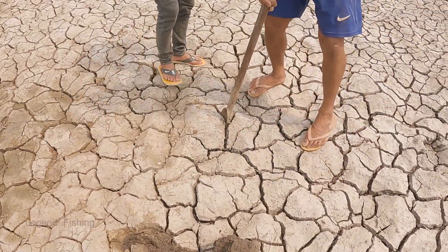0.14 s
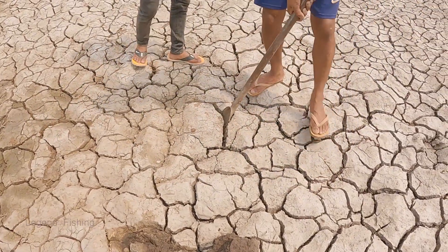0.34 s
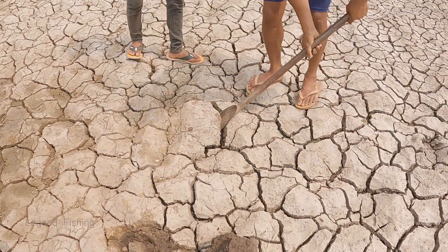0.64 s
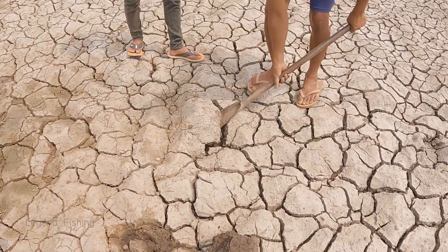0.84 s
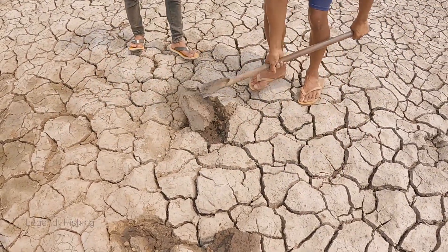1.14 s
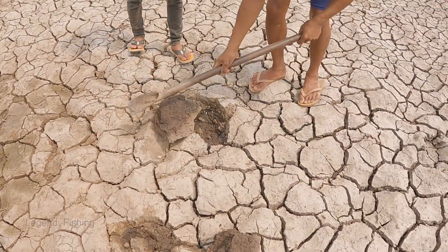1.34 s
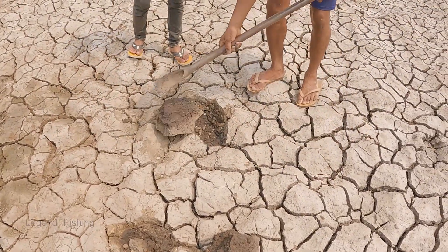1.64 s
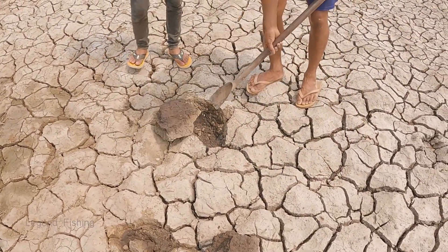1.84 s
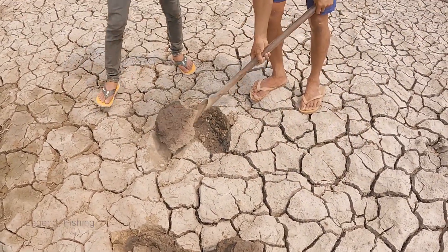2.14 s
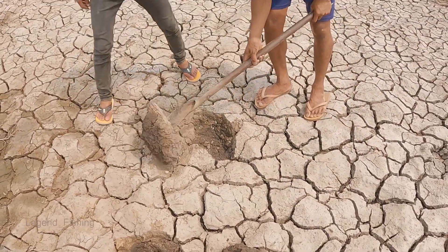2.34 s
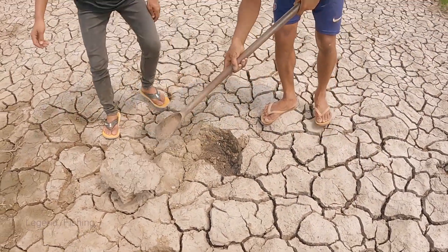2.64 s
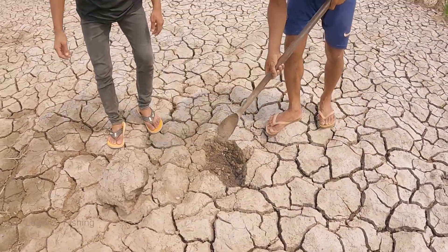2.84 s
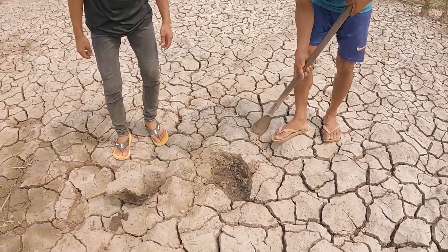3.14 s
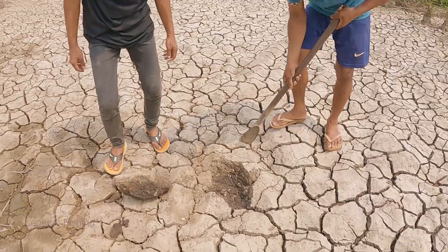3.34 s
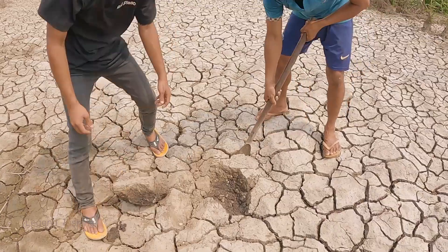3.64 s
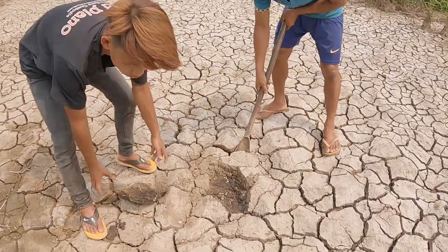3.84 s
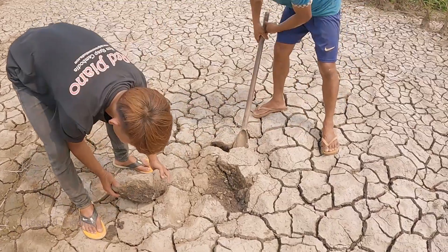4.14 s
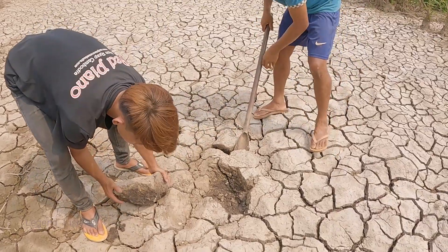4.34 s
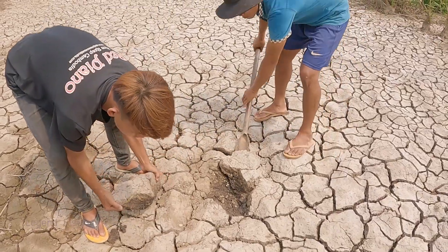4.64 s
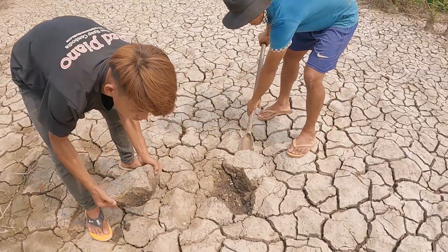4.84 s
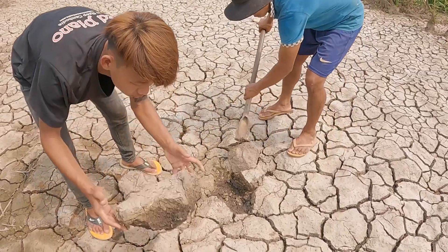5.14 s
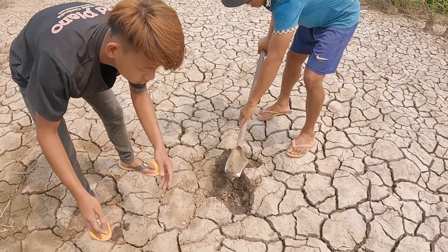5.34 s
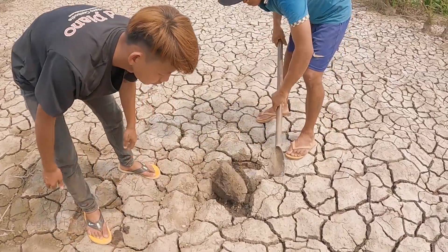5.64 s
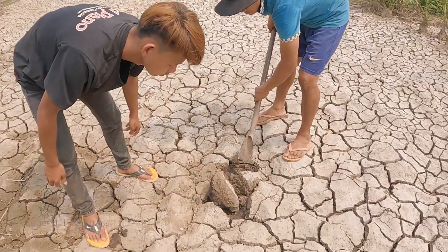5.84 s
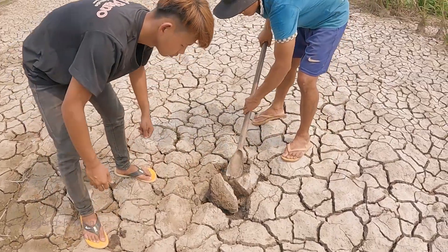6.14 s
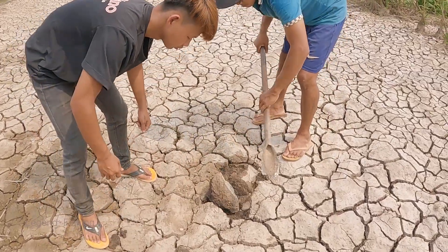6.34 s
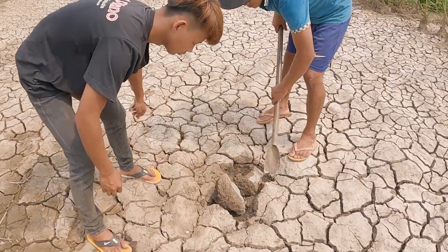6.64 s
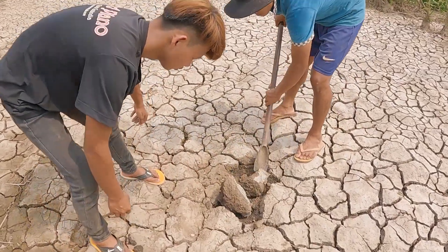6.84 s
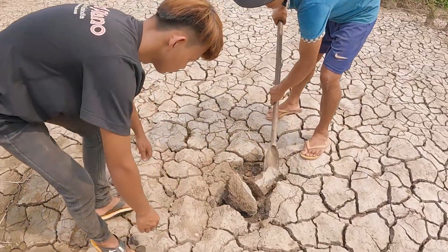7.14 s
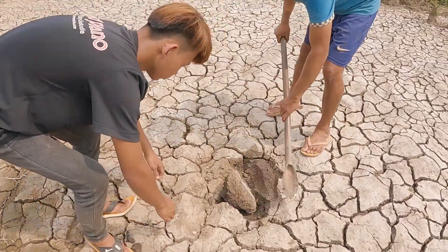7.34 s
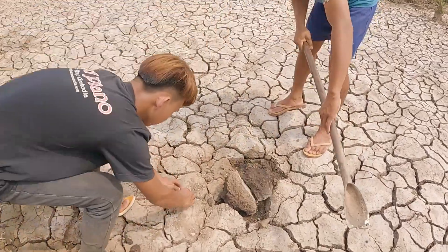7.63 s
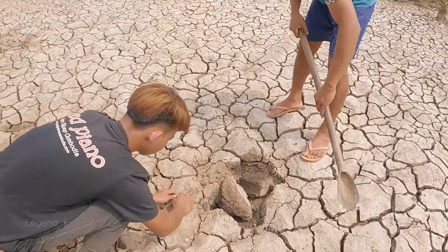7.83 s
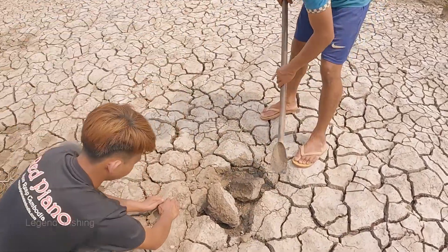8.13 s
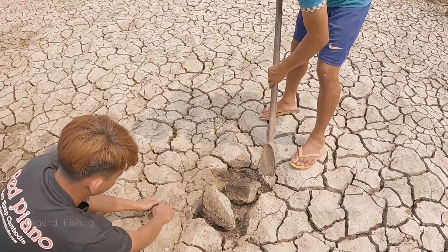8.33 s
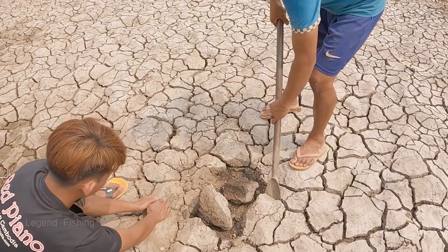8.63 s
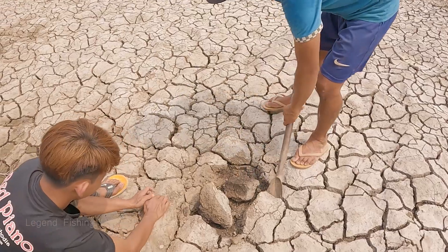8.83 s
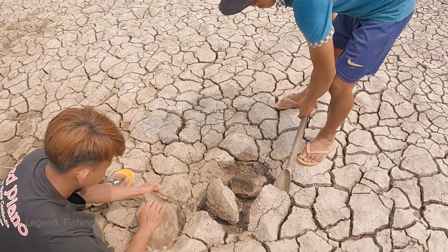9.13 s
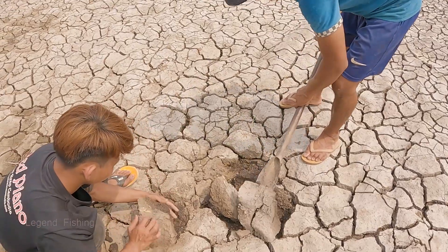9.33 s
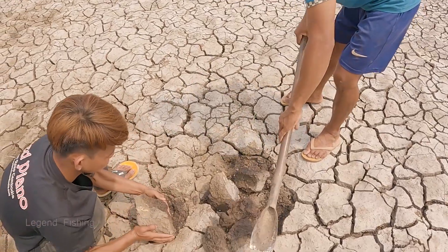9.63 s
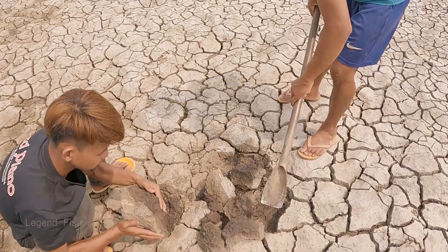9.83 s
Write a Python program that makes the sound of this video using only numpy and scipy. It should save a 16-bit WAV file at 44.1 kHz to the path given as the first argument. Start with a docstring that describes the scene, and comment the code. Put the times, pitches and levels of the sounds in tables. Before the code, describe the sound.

Close stereo outdoors on a dry cracked field. A steel spade grinds into hard clay, knocks out a sharp crunch with a short metallic ring, and clods thud down. Grit trickles between irregular blows, hands brush the shaft, and a small bird whistles short chirps throughout. Later blows crunch heavier, then an insect buzzes faintly near the end.

```python
"""A steel spade on a hollow steel shaft chops, scrapes and pries at sun-dried mud in an open field.
Noise bursts and damped grains make the clay; damped modes ring as blade and shaft; low swings are thuds.
Band-shaped noise gives palms on the shaft, far air and light wind rumble on two close microphones.
A gliding sine whistles as a small bird calling again and again at uneven gaps;
clicks and buzz rattle as an insect near the end."""
import sys
import numpy as np
from scipy import signal
from scipy.fft import rfft, irfft, next_fast_len
from scipy.io import wavfile
from scipy.ndimage import uniform_filter1d, map_coordinates

SR = 44100
rng = np.random.default_rng(int(sys.argv[2]) if len(sys.argv) > 2 else 0)


def master(y):
    """Save y as 16-bit WAV."""
    cut = np.clip(np.atleast_2d(y).T, -1, 1)
    pcm = np.round(cut * 32767)  # scale
    wavfile.write(sys.argv[1], SR, pcm.astype(np.int16))


N = 440118
T = np.arange(N) / SR

# far air and insects: (frequency [Hz], density [dB per Hz])
FIELD_SPECTRUM = [(65, -76), (110, -15), (188, 0.5), (261, -10.5), (792, -28), (1410, -15.5), (3480, -36.5),
                  (7450, -14), (8260, -31), (11700, -44), (15000, -103)]
FIELD_DB = -67
# wind on the microphone ports: (frequency [Hz], density [dB per Hz])
RUMBLE_SPECTRUM = [(15, -11), (35, 5.5), (70, -5), (120, -9), (170, 0.5), (260, -57)]
# wind: (time [s], level [dB])
WIND_LEVEL = [(0, -74), (.6, -100), (2.06, -69.5), (2.67, -58), (3.17, -67.5), (3.56, -61), (4.3, -70),
              (5.9, -73), (6.34, -59), (7.09, -65), (7.64, -53), (8.4, -66), (9.98, -60)]
# loose grit: (time [s], level [dB])
CRUMBLE_LEVEL = [(0.0, -64.5), (0.67, -59), (1.03, -69), (1.25, -59.5), (1.8, -69), (2.06, -67),
                 (2.28, -60), (3.11, -74), (3.72, -63), (4.5, -81), (5.31, -60.5), (5.55, -54), (6.14, -63),
                 (7.0, -58), (7.3, -69), (7.55, -56), (8.5, -75.5), (8.73, -66), (9.59, -59), (9.98, -54.5)]
# loose grit: (frequency [Hz], density [dB per Hz])
GRIT_SPECTRUM = [(150, 6.5), (297, 5.5), (687, -48), (935, -3), (1390, -1), (5010, -1), (9450, -9),
                 (15000, -35)]
TRICKLE_DB, TRICKLE_T60_S = -22, 0.11  # grit set loose by every crunch: level relative to it
# blade crushing clay, or a clod bursting:
# (start [s], level at the top [dB], rise [s], hold [s], tilt [dB per octave])
CRUNCHES = [(0.045, -32.5, 0.06, 0.02, 4), (0.151, -44.5, 0.012, 0.035, 2), (0.44, -50, 0.031, 0.12, -0.5),
            (1.47, -34, 0.0018, 0.0078, -2), (1.809, -39, 0.006, 0.0078, -7),
            (2.162, -19, 0.0016, 0.0032, 2), (2.517, -37.5, 0.014, 0.008, 2.5),
            (2.888, -47.5, 0.0068, 0.054, 0.5), (3.547, -24.5, 0.0024, 0.036, 3),
            (3.697, -47, 0.0034, 0.081, 0), (4.014, -43, 0.0082, 0.043, -2.5),
            (5.563, -22.5, 0.0006, 0.013, -2.5), (5.6, -35, 0.0045, 0.022, -8.5),
            (6.143, -34.5, 0.00084, 0.0098, 1), (6.19, -35.5, 0.0054, 0.017, -4),
            (6.318, -36, 0.029, 0.0058, 2), (6.444, -33.5, 0.0067, 0.0019, -3.5),
            (6.918, -28.5, 0.00047, 0.028, 3), (7.338, -42, 0.0069, 0.071, -1.5),
            (7.436, -44, 0.046, 0.01, 1), (7.525, -46.5, 0.0069, 0.16, -4),
            (8.599, -23.5, 0.015, 0.018, 0.5), (8.636, -32, 0.0062, 0.034, 1),
            (9.597, -44.5, 0.019, 0.049, 2), (9.737, -29.5, 0.013, 0.002, 0)]
SAG_DB = -9  # fall of a crunch over its hold
SETTLE_T60_S = 0.12
TREBLE_HZ, TREBLE_T60_S = 2440, 0.07  # a crunch dies sooner above this pitch
# broken clay: (frequency [Hz], density [dB per Hz])
CLAY_SPECTRUM = [(150, 2), (250, 5.5), (391, -9.5), (1160, -13.5), (1820, -11), (3210, -7.5), (5030, -10),
                 (8880, -12), (15400, -42.5)]
# top-end roll-off of the microphones, on grains, snaps and scrapes: (frequency [Hz], gain [dB])
ROLLOFF = [(7000, 0.5), (10000, -1.5), (15000, -34)]
# blade and shaft wall modes: (frequency [Hz], level [dB], t60 at damping 1 [s])
STEEL_MODES = [(528, -5, .15), (810, -8, .14), (1100, -12, .15), (1170, -7, .18), (1480, -10, .1),
               (1630, -7, .2), (1920, -12, .15), (2095, -9, .24), (2333, -7, .2), (2530, -12, .24),
               (2670, -7, .07), (3100, -12, .17), (3505, -10, .22), (3825, -11, .13), (4135, -9, .21),
               (4900, -18, .1), (6950, -12, .08), (7650, -17, .1)]
# modes the blade sounds most while buried: frequency [Hz]
BURIED_HZ = np.array([1170, 4135])
FAVOUR_DB, BURIED_DB = 8, 12  # lift of the best excited modes: ringing, buried in clay
# single crumbs and flakes snapping: (time [s], peak level [dB], frequency [Hz])
CRACKS = [(0.08, -20, 3440), (0.435, -27.5, 2400), (0.568, -36, 1095), (0.603, -45.5, 664),
          (0.699, -34, 4040), (0.753, -37.5, 1270), (1.118, -34.5, 1560), (1.67, -40, 1210),
          (2.165, -21.5, 480), (2.251, -36, 2800), (2.411, -42, 1230), (2.433, -38, 540),
          (2.731, -41.5, 530), (2.843, -43, 4150), (2.947, -39.5, 6700), (3.553, -19, 3930),
          (3.587, -25, 1430), (3.68, -38, 1300), (3.781, -29, 1860), (4.002, -37.5, 1670),
          (4.642, -38.5, 4160), (4.842, -41, 1280), (5.414, -30.5, 6540), (5.624, -32, 1200),
          (5.656, -41, 1500), (5.715, -46, 1820), (5.82, -43.5, 4340), (5.849, -40.5, 7100),
          (5.902, -37, 1410), (6.235, -39.5, 970), (6.587, -28.5, 1240), (6.786, -40, 614),
          (7.041, -39, 4200), (7.087, -40.5, 2260), (7.13, -39.5, 1630), (7.15, -38.5, 1690),
          (7.27, -30.5, 1260), (7.278, -32.5, 617), (7.341, -39, 1240), (7.361, -30, 1260),
          (7.389, -34, 926), (7.411, -47, 956), (7.524, -39, 958), (7.537, -45, 926), (7.584, -40, 1500),
          (7.599, -38.5, 700), (7.635, -38.5, 1040), (7.675, -35, 493), (7.692, -30.5, 1850),
          (7.771, -42, 1150), (7.855, -41.5, 1340), (8.121, -37.5, 1330), (8.657, -32.5, 9250),
          (8.83, -34, 5470), (9.712, -35.5, 2060), (9.779, -35, 470), (9.828, -34.5, 1170)]
SNAP_S, SNAP_CYCLES = 0.018, 6  # t60 of a snap: fixed part plus cycles of its pitch
# bird calls: (time [s], level [dB], last note's added level [dB])
BIRD_CALLS = [(0.2836, -41, -8), (0.8832, -39.5, -16), (1.358, -43, -10), (1.892, -43.5, -11),
              (2.3985, -47, -6), (2.8506, -46, 1.5), (3.3348, -45.5, -4), (3.7292, -45.5, 1),
              (4.116, -46, 1.5), (4.7076, -46.5, 2.5), (5.2057, -47.5, 3), (5.563, -43, -10),
              (6.074, -47.5, 0), (6.495, -47, 3.5), (6.975, -44.5, -2), (7.481, -44, -4), (7.9605, -47, -4),
              (8.402, -45.5, -8), (8.796, -48.5, -8), (9.114, -45, -3.5), (9.5575, -44, -6),
              (9.8218, -44.5, -4)]
# one call before variation: (time from its upstroke [s], frequency [Hz], level [dB])
CHIRP = [(-.013, 3600, -15), (-.005, 4170, 0), (-.0032, 4300, -14), (-.0025, 5000, -12), (0, 5700, -3),
         (.004, 6050, -1), (.008, 5400, -2), (.011, 4900, -13), (.015, 4660, -2), (.023, 4650, 0),
         (.033, 5000, -24)]
# blade dragging over the crust: (start [s], length [s], level [dB], best excited mode [Hz])
SCRAPES = [(0.401, 0.082, -51, 1480), (4.643, 0.068, -55, 4135), (4.721, 0.16, -59.5, 1170),
           (4.929, 0.28, -61, 1630), (5.299, 0.26, -53.5, 1480), (6.311, 0.03, -42, 2333),
           (6.798, 0.045, -62, 2670), (9.005, 0.071, -49, 1630)]
SCRAPE_WIDTH_HZ = 310
# palms sliding on the shaft: (start [s], loudest [s], end [s], level [dB])
SLIDES = [(0.708, 0.9, 1.15, -48.5), (1.152, 1.18, 1.3, -57.5), (1.451, 1.559, 1.664, -47),
          (1.667, 1.832, 1.873, -51), (1.933, 2.116, 2.13, -52), (2.71, 2.85, 3.07, -61),
          (4.014, 4.24, 4.58, -53)]
GRIP_S, START_DB, END_DB = 0.0044, -7.5, -18  # fade at both ends; level there against the loudest
# skin on steel: (frequency [Hz], density [dB per Hz])
PALM_SPECTRUM = [(585, -62), (2070, -17.5), (2390, -14), (3370, -15), (4110, -4), (5380, -10.5),
                 (11900, -18.5), (15000, -41)]
# shaft wall under the palms: (frequency [Hz], width [Hz], gain [dB])
PALM_MODES = [(1240, 100, 31.5), (4160, 9.1, 14.5), (7950, 1100, 10)]
# clods and heels on the ground: (time [s], peak level [dB], frequency [Hz])
THUDS = [(0.723, -41.5, 219), (1.485, -27.5, 188), (1.81, -44, 59.5), (2.729, -30.5, 67.7),
         (2.842, -37.5, 185), (3.19, -37.5, 173), (3.499, -44, 62.3), (3.554, -35, 142), (3.777, -42, 212),
         (4.02, -42, 187), (4.641, -49, 156), (4.914, -50.5, 116), (5.566, -29, 169), (5.589, -33, 61.3),
         (6.006, -44.5, 127), (6.172, -17.5, 176), (6.214, -34, 68.4), (6.454, -22, 162), (6.59, -38, 175),
         (6.799, -38, 174), (7.36, -32.5, 240), (7.666, -40.5, 74), (7.984, -37, 169), (8.607, -34, 169),
         (8.64, -29.5, 188), (9.191, -52, 70.4), (9.747, -27, 183), (9.782, -27, 175)]
# blows that leave the steel ringing:
# (time [s], level [dB], best excited [Hz], second best excited [Hz], damping by clay and hands [factor])
RINGS = [(1.403, -47.5, 1170, 2333, 0.68), (2.074, -43, 3100, 3100, 1.25), (2.164, -32, 4135, 3100, 1.6),
         (2.527, -37, 1630, 2670, 0.94), (5.437, -43.5, 1630, 3505, 2.4), (5.494, -41, 3100, 3505, 1.7),
         (6.146, -32, 528, 2095, 2.7), (6.341, -30.5, 3505, 4900, 3.7), (6.919, -27.5, 2333, 4135, 1.1)]
# air column in the shaft: (frequency [Hz], level [dB], t60 at damping 1 [s])
SHAFT_MODES = [(200, -2, .5), (403, 0, .42), (603, -8, .3), (806, -7, .18), (1010, -14, .17),
               (1207, -6, .1)]
# knocks that sound the air column: (time [s], level [dB], best excited [Hz], damping by hands [factor])
KNOCKS = [(2.164, -33, 1207, 1.1), (6.919, -54.5, 200, 1.03), (7.272, -44, 1207, 0.96)]
# insect: (time [s], click level [dB], buzz level [dB])
WINGS = [(9.38, -71, -59), (9.43, -58, -55), (9.52, -55.5, -56.5), (9.6, -59.5, -56), (9.72, -58.5, -58)]
WING_HZ = 238  # mean beat rate
# digging, left against right port: (frequency [Hz], phase lead [rad])
LEAD = [(100, 0.37), (800, -0.32), (3100, -0.71), (6000, -0.95), (7500, 0.38), (9300, 0.45)]
# digging, left against right port: (frequency [Hz], level difference [dB])
LEVEL = [(150, 0), (400, -2), (2500, -1.5), (6000, 0), (12000, .5)]
TOP_HZ = 15500


def amp(db):
    """dB to gain."""
    return 10 ** (np.asarray(db) / 20)


def unit(x):
    """Scaled to rms 1."""
    return x / np.sqrt(np.mean(x ** 2) + 1e-20)


def along(points, hz):
    """(frequency, value) points interpolated on a log axis."""
    f, v = np.transpose(points)
    return np.interp(np.log(hz + 1), np.log(f + 1), v)


def curves(rows):
    """One value per sample for each column after the time."""
    s, *cols = np.transpose(rows)
    return [np.interp(T, s, c) for c in cols]


def wobble(rate_hz):
    """A smooth random curve, rate_hz knots a second."""
    return map_coordinates(rng.standard_normal(int(N * rate_hz / SR) + 4), [T * rate_hz])


def filtered(x, response):
    """x times a response of frequency."""
    m = next_fast_len(x.shape[-1] + 4096)
    return irfft(rfft(x, m) * response(np.fft.rfftfreq(m, 1 / SR)), m)[..., :x.shape[-1]]


def resonance(f, hz, width_hz):
    """A damped resonance with top 1."""
    return 1j * f * width_hz / (hz * hz - f * f + 1j * f * width_hz)


def pair(spectrum, alike, rough_db=0, rate_hz=100):
    """Stereo noise of rms 1, partly shared, with a fast uneven level."""
    noise = rng.standard_normal((2, N)) * amp(rough_db * wobble(rate_hz))
    mid, side = filtered(noise, lambda hz: amp(along(spectrum, hz)))
    turn = np.arccos(np.clip(alike, 0, 1)) / 2
    left = np.cos(turn) * mid + np.sin(turn) * side
    right = np.cos(turn) * mid - np.sin(turn) * side
    return unit(np.array([left, right]))


def add(out, s, x):
    """Mixes x into out from time s."""
    part = out[..., max(round(s * SR), 0):][..., :x.shape[-1]]
    part += x[..., :part.shape[-1]]


def grains(times, sizes, hz, spread_oct, cycles):
    """Tiny damped sines at scattered pitches, summed."""
    scattered_hz = hz * 2 ** (spread_oct * rng.standard_normal(len(times)))
    pitch_hz = np.clip(scattered_hz, 300, 9000)[:, None]
    k = np.arange(400)
    turns = pitch_hz * k / SR
    # low grains last longer, so they start weaker
    start = sizes[:, None] * np.sqrt(pitch_hz / hz)
    wave = start * np.sin(2 * np.pi * turns) * np.exp(-turns / cycles) * (1 - k / len(k))
    index = (times * SR).astype(int)[:, None] + k
    out = np.bincount(index.ravel(), wave.ravel(), N + len(k))[:N]
    return filtered(out, lambda f: amp(along(ROLLOFF, f)))


def field():
    """Far hiss of the open field and wind lumps on the ports, both shaped noise."""
    swell_db = 1.5 * wobble(3)
    air = amp(FIELD_DB + swell_db) * pair(FIELD_SPECTRUM, 0.1)
    lumps = amp(5.5 * wobble(11) - 4)
    return air + amp(curves(WIND_LEVEL)[0]) * lumps * pair(RUMBLE_SPECTRUM, 0.89)


def grit_level():
    """Level of loose grit, in fits with gaps, plus a trickle after every crunch."""
    level = amp(curves(CRUMBLE_LEVEL)[0] + 2 * wobble(14))
    for s, db, rise, hold, _ in CRUNCHES:
        add(level, s + rise + hold, amp(db + TRICKLE_DB - 60 * T[:SR] / TRICKLE_T60_S))
    return level


def crumbs():
    """Loose grit trickles; crumbs of all sizes tick on the crust in clumps, with a few duller lumps."""
    times = np.sort(rng.uniform(0, T[-1], 9000))
    clump_db = 4 * wobble(45)[(times * SR).astype(int)]
    size_db = np.minimum(4 * rng.exponential(size=len(times)) + clump_db, 17)
    ticks = unit(grains(times, amp(size_db), hz=2180, spread_oct=1.264, cycles=4.6))

    times = rng.uniform(0, T[-1], 900)
    clump_db = 3.3 * wobble(28)[(times * SR).astype(int)]
    size_db = np.minimum(5 * rng.exponential(size=len(times)), 8) + clump_db
    lumps = unit(grains(times, amp(size_db), hz=937, spread_oct=0.96, cycles=4.8))

    trickle = pair(GRIT_SPECTRUM, 1.0, rough_db=4.0, rate_hz=66)
    return grit_level() * (trickle + amp(-3) * ticks + amp(-8) * lumps)


def crunches():
    """A shower of fractures that swells, holds and dies, coloured by the buried blade."""
    out, t = np.zeros((2, N)), T[:SR // 2]
    times = np.sort(rng.uniform(0, T[-1], 9000))
    sizes = amp(np.minimum(4 * rng.exponential(size=len(times)), 12))
    shards = unit(grains(times, sizes, hz=1600, spread_oct=1.1, cycles=3))
    mode_hz = np.transpose(STEEL_MODES)[0]
    for s, db, rise, hold, tilt_db in CRUNCHES:
        # clay grips the blade differently each time
        touch_db = rng.normal(0, 3, len(STEEL_MODES)) + BURIED_DB * np.isin(mode_hz, BURIED_HZ)

        def colour(f):
            modes = sum(amp(level_db / 2 + extra_db) * resonance(f, hz, 320)
                        for (hz, level_db, _), extra_db in zip(STEEL_MODES, touch_db))
            return (1 + amp(4) * modes) * amp(tilt_db * np.log2((f + 200) / 2000))

        lumps = amp(2.8 * map_coordinates(rng.standard_normal(100), [t * 180]))
        after_s = np.maximum(t - rise - hold, 0)
        sag_db = SAG_DB * np.clip((t - rise) / hold, 0, 1)
        shape = np.clip(t / max(rise, .0005), 0, 1) * amp(sag_db - 60 * after_s / SETTLE_T60_S)

        noise = rng.standard_normal((2, len(t))) * [[1], [.2]]
        mid, side = unit(filtered(noise, lambda hz: amp(along(CLAY_SPECTRUM, hz))))
        dust = mid + side * np.array([[1], [-1]])
        fractures = lumps * (dust + amp(-3.5) * np.resize(shards[round(s * SR):], len(t)))

        sooner = amp(-60 * after_s * max(1 / TREBLE_T60_S - 1 / SETTLE_T60_S, 0))
        late_low = filtered(shape * (1 - sooner) * fractures, lambda hz: 1 / (1 + (hz / TREBLE_HZ) ** 2))
        burst = filtered(shape * sooner * fractures + late_low, colour)
        add(out, s, amp(db) * unit(burst) * np.sqrt(np.mean(shape ** 2)))
    return out


def cracks():
    """Each snap is a short puff of noise around its own pitch; low ones last longer."""
    out, t = np.zeros(N), T[:SR // 8]
    for s, db, centre_hz in CRACKS:
        decay = amp(-60 * t / (SNAP_S + SNAP_CYCLES / centre_hz))
        puff = rng.standard_normal(len(t)) * decay * (1 - np.exp(-t / 0.00053))
        puff[:4] = 0.82  # the break itself: one hard click

        def colour(f):
            body = resonance(f, centre_hz, 0.27 * centre_hz) + 0.065 * amp(along(CLAY_SPECTRUM, f))
            return amp(along(ROLLOFF, f)) * body

        puff = filtered(puff, colour)
        add(out, s, amp(db) * puff / np.abs(puff).max())
    return out


def bird():
    """A gliding sine, a little different each call, with a soft noise-tail echo from the field's edge."""
    out, t = np.zeros(N), T[:SR // 16]
    s0, hz, db = np.transpose(CHIRP)
    # relative changes: pitch, pace, upturn of the last note
    change = rng.standard_normal((len(BIRD_CALLS), 3)) * [.012, .05, .07]
    for (s, top_db, tail_db), (pitch, pace, upturn) in zip(BIRD_CALLS, change):
        u = s0[0] + t * (1 + pace)
        bend = 1 + pitch + abs(upturn) * np.clip(u / s0[-1], 0, 1) ** 2
        glide_hz = bend * uniform_filter1d(np.interp(u, s0, hz), 60)
        phase = 2 * np.pi * np.cumsum(glide_hz) / SR
        level_db = top_db + np.interp(u, s0, db, right=-120) + tail_db * (u > .011)
        add(out, s + s0[0], amp(level_db) * np.sin(phase))
    tail = rng.standard_normal((2, SR // 4)) * amp(-60 * T[:SR // 4] / 0.077)
    delayed = np.pad(out, (200, 0))[None]
    echo = signal.fftconvolve(delayed, tail / np.linalg.norm(tail[0]), axes=1)[:, :N]
    return out * amp([[-1.5], [1.5]]) + amp(-2) * echo


def scrapes():
    """Uneven friction noise that sounds only through the modes of the steel, most near the best pitch."""
    out = np.zeros(N)
    for s, length, db, aim_hz in SCRAPES:
        best_hz = min(np.transpose(STEEL_MODES)[0], key=lambda hz: abs(hz - aim_hz))
        u = np.linspace(0, 1, round(length * SR))

        def wall(f):
            modes = 0
            for hz, level_db, _ in STEEL_MODES:
                favour_db = 14.0 * (hz == best_hz) - 5.9 * abs(np.log2(hz / best_hz))
                modes = modes + amp(level_db + favour_db) * resonance(f, hz, SCRAPE_WIDTH_HZ)
            return amp(along(ROLLOFF, f)) * modes

        rub = rng.standard_normal(len(u)) * amp(4.1 * wobble(61.2)[:len(u)])
        stroke = np.sqrt(np.abs(np.sin(np.pi * u)))
        add(out, s, amp(db) * stroke * unit(filtered(rub, wall)))
    return out


def palms():
    """Skin rubs the shaft: a smooth hiss coloured by its wall."""
    level = 0
    for start, top, end, db in SLIDES:
        knots_s = [start - GRIP_S, start, top, end, end + GRIP_S]
        knots_db = db + np.array([-30, START_DB, 0, END_DB, -40])
        level = level + amp(np.interp(T, knots_s, knots_db, -120, -120))

    def wall(f):
        return 1 + sum(amp(db) * np.abs(resonance(f, hz, width_hz)) for hz, width_hz, db in PALM_MODES)

    return level * unit(filtered(pair(PALM_SPECTRUM, 0.99, rough_db=1.5, rate_hz=87), wall))


def thuds():
    """A heavy soft contact: the ground gives, swings back once and settles, with deeper sway and rubble."""
    out, t = np.zeros(N), T[:SR // 4]
    for s, db, hz in THUDS:
        cycles = hz * t
        swing = -np.sin(2 * np.pi * cycles) * cycles * np.exp(1 - cycles / .6)
        sway_hz = 70 * 2 ** rng.normal(0, 0.314)
        sway = np.sin(2 * np.pi * sway_hz * t) * np.exp(-t / 0.017) * (1 - np.exp(-t / 0.006))
        rough = unit(filtered(rng.standard_normal(len(t)), lambda f: resonance(f, 2 * hz, 2 * hz)))
        rubble = rough * cycles * np.exp(-1.5 * cycles)
        push = swing + 0.36 * sway + 0.3 * rubble
        add(out, s, amp(db) * push / np.abs(push).max())
    return out


def ring(modes, damping, best_hz, waver_rad, t):
    """Decaying modes at fresh strengths, strongest at the best pitches, each wavering in phase."""
    hz, db, t60 = np.transpose(modes)[..., None]
    away_oct = np.log2(hz / best_hz)
    favour_db = (FAVOUR_DB * np.exp(-(away_oct / .02) ** 2)).sum(1, keepdims=True)
    loss_db = (away_oct ** 2 / 2).min(1, keepdims=True)
    db = db + favour_db - loss_db + rng.normal(0, 1.5, hz.shape)
    drift = np.cumsum(rng.normal(0, waver_rad, (len(hz), len(t))), 1)
    tones = amp(db - 60 * damping * t / t60) * np.sin(2 * np.pi * hz * t + drift)
    return np.sum(tones, 0) * (1 - np.exp(-t / 0.0006))


def spade():
    """The steel rings, wavering with clay on it, and so does the air in the hollow shaft, steadier."""
    out, t = np.zeros(N), T[:SR // 2]
    for s, db, first_hz, second_hz, damping in RINGS:
        add(out, s, amp(db) * ring(STEEL_MODES, damping, np.array([first_hz, second_hz]), 0.022, t))
    for s, db, best_hz, damping in KNOCKS:
        add(out, s, amp(db) * ring(SHAFT_MODES, damping, np.array([best_hz]), 0.0015, t))
    return out


def insect():
    """Wing beats: bright resonant clicks at an uneven rate over a rough noise buzz."""
    click_db, buzz_db = curves(WINGS)
    beat_count = np.floor(np.cumsum(WING_HZ * (1 + 0.065 * wobble(33))) / SR)
    beats = np.diff(beat_count, prepend=0) * amp(1.6 * wobble(150))
    clicks = unit(filtered(beats, lambda f: resonance(f, 5100, 3700) ** 3 + 1.7 * resonance(f, 6370, 1700) ** 2))
    noise = rng.standard_normal(N)
    buzz = unit(filtered(noise, lambda f: resonance(f, 1450, 340) ** 2 - resonance(f, 1810, 320) ** 2))
    flying = (T > WINGS[0][0]) & (T < WINGS[-1][0])
    return flying * (amp(click_db) * clicks + amp(buzz_db) * buzz)


def scene():
    """All sources at the two microphone ports."""
    digging = crumbs() + crunches() + cracks() + scrapes() + palms() + thuds() + spade()

    # the pit lies a little to the right: the left port hears its mids later and weaker
    def half(hz):
        return amp(along(LEVEL, hz) / 2) * np.exp(.5j * along(LEAD, hz))

    digging = filtered(digging, lambda hz: np.array([half(hz), 1 / half(hz)]))
    return field() + digging + bird() + insect()


def record(dry):
    """Band limit: nothing passes above TOP_HZ."""
    return filtered(dry, lambda hz: hz < TOP_HZ)


dry = scene()
out = record(dry)
master(out)
```